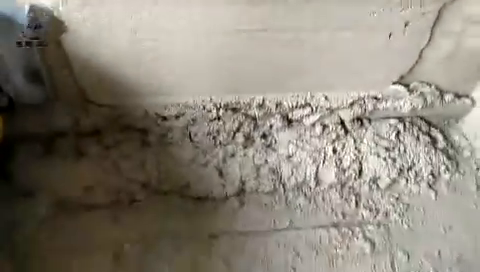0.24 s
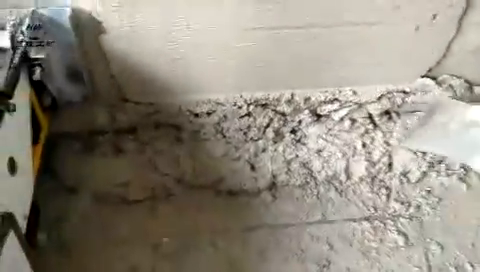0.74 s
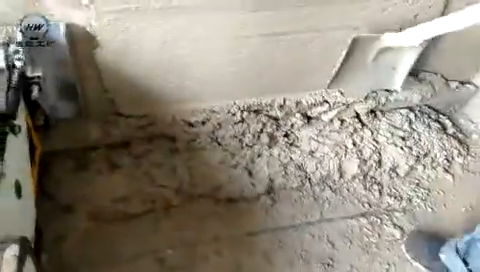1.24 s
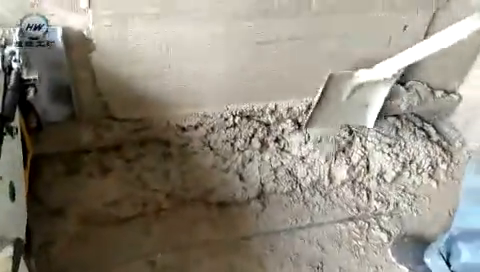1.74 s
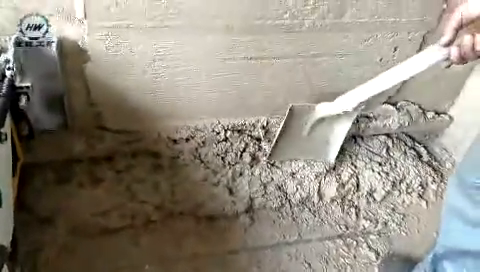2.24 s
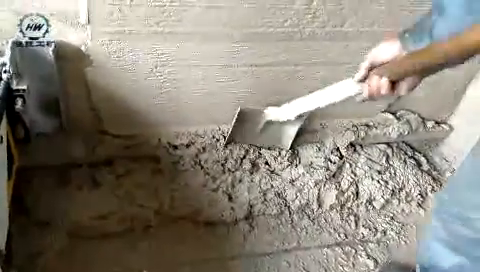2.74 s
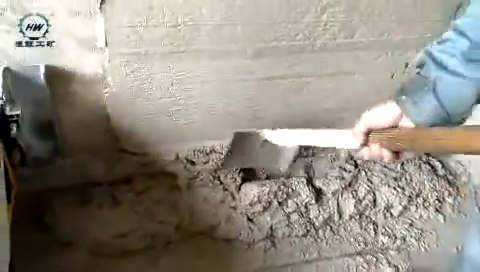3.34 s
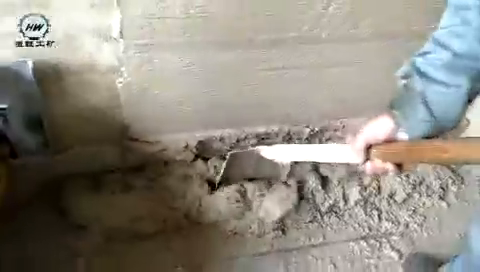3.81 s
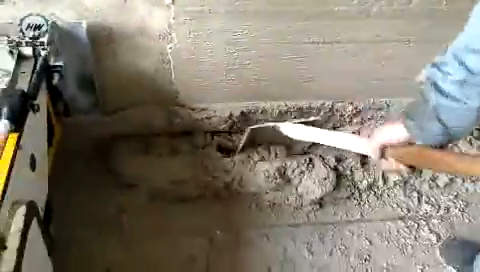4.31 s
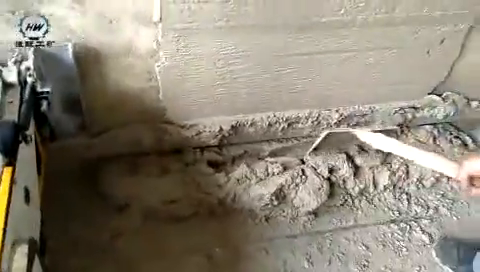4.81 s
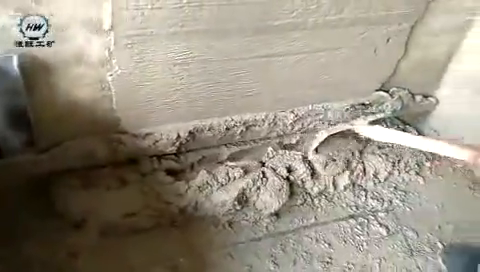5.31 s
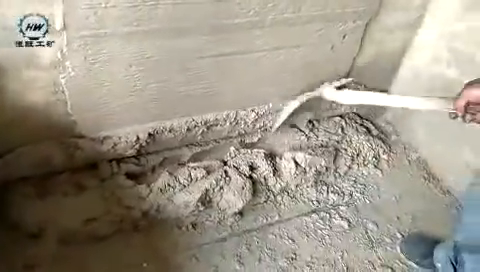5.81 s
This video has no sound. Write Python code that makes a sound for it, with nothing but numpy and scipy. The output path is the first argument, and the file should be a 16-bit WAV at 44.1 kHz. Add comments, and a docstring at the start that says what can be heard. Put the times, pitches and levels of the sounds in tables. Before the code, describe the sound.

A shovel works damp mortar at close range. Faint sand scuffs come first, then one loud dull thump with a gritty bite, softer scrapes and a sliding trickle of crumbs. Three crisp metallic chops space out across the later seconds before a brief harsh scrape and a final thud. The bare room adds a short dense reverb; the treble is sharp, with faint hiss and low building rumble beneath.

```python
"""A steel shovel works fallen mortar at the foot of a wall in a small bare concrete room.
Over quiet building rumble and hiss, filtered random grains make sand grind and small stones tick.
Crumbs slide off the heap, then soft masses thud as grain bursts that excite the room's modes.
From two seconds the edge chops, ringing the damped blade; near the end it drags on the concrete.
Two microphone ports close by, ringing in the treble, hear it all through decaying-noise wall echoes."""
import sys
import numpy as np
from scipy import signal
from scipy.fft import rfft, irfft
from scipy.io import wavfile

SR = 44100
rng = np.random.default_rng(int(sys.argv[2]) if len(sys.argv) > 2 else 0)


def persist_wave(psi):
    """Save psi, clipped to +-1, as 16-bit WAV."""
    counts = np.round(np.clip(psi, -1, 1) * 32767).astype(np.int16)
    wavfile.write(sys.argv[1], SR, np.atleast_2d(counts).T)


N = 267334
T = np.arange(N) / SR


def undb(db):
    """Decibels to gain."""
    return 10 ** (np.asarray(db) / 20)


def unit(x):
    """Scale to an energy of one."""
    return x / np.sqrt(np.sum(x ** 2) + 1e-18)


def on_log(hz, points):
    """Read (Hz, value) points along a log-frequency axis."""
    point_hz, value = np.transpose(points)
    return np.interp(np.log(np.maximum(hz, 1)), np.log(point_hz), value)


def colour(x, points):
    """Causal minimum-phase filter with the given (Hz, dB) response, by cepstrum folding."""
    size = 4096
    response_db = on_log(np.fft.rfftfreq(size, 1 / SR), points)
    cepstrum = irfft(np.log(undb(response_db)))
    cepstrum[1:size // 2] *= 2
    cepstrum[size // 2 + 1:] = 0
    impulse = irfft(np.exp(rfft(cepstrum)))
    return signal.fftconvolve(x, impulse)[:len(x)]


def band(x, low_hz, high_hz, order=2):
    """Band-pass between two edges."""
    high_hz = min(max(high_hz, low_hz * 1.1), SR * .48)
    sos = signal.butter(order, [low_hz, high_hz], "band", fs=SR, output="sos")
    return signal.sosfilt(sos, x)


def ring(x, modes):
    """The decaying modes that a sound excites, as (Hz, t60 s, dB)."""
    t = T[:SR // 2]
    response = 0
    for hz, t60_s, db in modes:
        mode = np.cos(2 * np.pi * hz * t) * undb(-60 * t / t60_s)
        response = response + undb(db) * unit(mode)
    return signal.fftconvolve(x, response)[:len(x)]


def grains(count, per_s, spread_db):
    """Sand grains crack at random moments with widely differing sizes; rms 1."""
    happens = rng.random(count) < per_s / SR
    sizes = undb(spread_db * np.minimum(rng.exponential(size=count), 4))
    signs = rng.choice([-1, 1], count)
    return unit(happens * sizes * signs) * np.sqrt(count)


def contact(length_s, first_blow, per_s, spread_db):
    """A first blow, then grains crushed for as long as the contact lasts."""
    push = np.zeros(SR // 3)
    count = max(int(length_s * SR), 40)
    push[:count] = unit(grains(count, per_s, spread_db))
    push[0] += first_blow
    return push


def add(out, s, sound, db, pan_db=0):
    """Place a sound; its level is its energy spread over a hundredth of a second."""
    start = int(s * SR)
    sound = (unit(sound) * np.sqrt(SR / 100))[:N - start]
    ports_db = db + np.array([[pan_db], [-pan_db]]) / 2
    out[:, start:start + len(sound)] += undb(ports_db) * sound


def rubbing(points, per_s, spread_db, judder_db, judder_hz):
    """A stream of grains that catches and slips as a random gain; rms 1."""
    knots = rng.standard_normal(N // 100)
    judder = np.interp(T * judder_hz, np.arange(len(knots)), knots)
    stream = grains(N, per_s, spread_db) * undb(judder_db * judder)
    return unit(colour(stream, points)) * np.sqrt(N)


def stroke(start_s, rise_s, hold_s, fall_db_per_s):
    """Gain of one movement: the pressure builds smoothly, holds and dies away."""
    build = np.sin(np.pi / 2 * np.clip((T - start_s) / rise_s, 0, 1)) ** 2
    since_release_s = np.maximum(T - start_s - rise_s - hold_s, 0)
    return build * undb(-fall_db_per_s * since_release_s)


def strokes(rows, fall_db_per_s):
    """Joint gain of (start s, rise s, hold s, dB) strokes; their powers add."""
    power = 0
    for s, rise_s, hold_s, db in rows:
        power = power + (undb(db) * stroke(s, rise_s, hold_s, fall_db_per_s)) ** 2
    return np.sqrt(power)


# noise floor spectrum: (frequency [Hz], density [dB per Hz])
FLOOR_SPECTRUM = [(20, -99), (45, -102), (80, -109), (200, -111), (700, -113), (3000, -113), (6000, -116),
                  (16000, -116)]


def air(side_share=0.72):
    """Quiet rumble of the building under a faint hiss, partly different at the two ports."""
    mid, side = (colour(rng.standard_normal(N), FLOOR_SPECTRUM) * np.sqrt(SR / 2) for _ in range(2))
    return mid + side_share * side * np.array([[1], [-1]])


# sand shifts under steel and soles, before fine_db and coarse_db:
# (start [s], rise [s], hold [s], level [dB], extra on the coarse grains [dB])
SAND_STROKES = [(0.048, .015, 0.0725, -53, -11), (0.473, 0.0678, 0.0244, -54.5, -2.5),
                (0.588, 0.019, 0.1025, -62.5, -6), (0.749, 0.05, 0.0177, -45.5, -11.5),
                (1.12, 0.0873, 0.0232, -52, -1.5), (1.314, 0.1344, .07, -56.5, -2),
                (1.569, 0.0227, 0.039, -62, -5.5), (1.938, 0.1053, 0.1286, -49, -5),
                (2.35, 0.0137, 0.0154, -63.5, -5), (2.702, 0.043, 0.1254, -47.5, -5.5),
                (2.964, 0.025, 0.009, -51, -9), (3.096, 0.0487, 0.124, -62, -11.5),
                (3.398, 0.1101, 0.015, -40.5, -18), (3.555, 0.1305, 0.172, -50.5, -24.5),
                (4.261, 0.0656, 0.1222, -49, -10), (4.538, 0.021, .02, -56.5, -19),
                (4.785, 0.0335, 0.069, -55, -5.5), (5.117, 0.0133, 0.016, -35.5, -18.5),
                (5.299, 0.069, 0.29, -59.5, -7), (5.968, 0.0255, 0.014, -45, -7.5)]
# grain colours: (frequency [Hz], relative level [dB])
FINE_SAND_COLOUR = [(200, -28), (1500, -8), (3000, -1), (4500, -0.5), (6500, -1.5), (9000, -8.5),
                    (16000, -8)]
COARSE_SAND_COLOUR = [(150, -12), (600, -6.5), (1200, -9), (1800, 3), (2600, 5), (4000, -3), (8000, -22),
                      (16000, -43.5)]
SAND_FALL_DB_PER_S = 190
# sand creaking steadily under the soles, before fine_db and coarse_db
SOLES_DB, SOLES_COARSE_DB = -69.5, -6  # second is relative to the first


def sand(fine_db=-6, coarse_db=-1):
    """Fine sand hisses and coarser grains crackle as blade and soles move."""
    fine = rubbing(FINE_SAND_COLOUR, per_s=2800, spread_db=6.0, judder_db=3.0, judder_hz=70.36)
    coarse = rubbing(COARSE_SAND_COLOUR, per_s=1700, spread_db=6.0, judder_db=6.5, judder_hz=64.44)
    s, rise_s, hold_s, db, rel_db = np.transpose(SAND_STROKES)
    fine_moves = strokes(zip(s, rise_s, hold_s, db), SAND_FALL_DB_PER_S)
    coarse_moves = strokes(zip(s, rise_s, hold_s, db + rel_db), SAND_FALL_DB_PER_S)
    fine_gain = np.hypot(fine_moves, undb(SOLES_DB))
    coarse_gain = np.hypot(coarse_moves, undb(SOLES_DB + SOLES_COARSE_DB))
    return undb(fine_db) * fine * fine_gain + undb(coarse_db) * coarse * coarse_gain


# single stones crack or flick against the steel, before the gains in scene():
# (time [s], level [dB], left minus right [dB])
STONE_TICKS = [(0.064, -59.5, 5), (.141, -64, 5.5), (1.53, -59.5, 1.5), (1.628, -55, 1.5), (2.71, -53, 5.5),
               (3.608, -53.5, 4.5), (4.3876, -50, 2), (4.452, -43, 0.5), (5.573, -54.5, 8),
               (5.599, -52.5, 6), (5.639, -56, 9)]


def ticks():
    """Small stones snap: very short and bright."""
    out = np.zeros((2, N))
    for s, db, pan_db in STONE_TICKS:
        snap = contact(.006, first_blow=.7, per_s=7000, spread_db=3)
        add(out, s, band(snap, 2500, 6500), db, pan_db)
    return out


# crumbs slide off the heap: (start [s], rise [s], hold [s], level [dB])
CRUMB_SLIDES = [(.48, 0.0236, 0.0395, -73.5), (2.88, 0.089, 0.171, -72), (3.42, 0.071, 0.2, -64.5),
                (3.64, 0.0167, 0.293, -58.5), (4.02, 0.0646, 0.057, -56.5)]
# (frequency [Hz], relative level [dB])
CRUMB_SPECTRUM = [(40, -3.5), (150, -3), (380, 3.5), (700, -6), (1500, -3.5), (4000, -6), (16000, -38)]
CRUMB_FALL_DB_PER_S = 125


def crumbs():
    """Damp crumbs patter down the heap as a sparse, dull grain stream."""
    patter = rubbing(CRUMB_SPECTRUM, per_s=400, spread_db=2, judder_db=2.5, judder_hz=35)
    return patter * strokes(CRUMB_SLIDES, CRUMB_FALL_DB_PER_S)


# standing waves of the room: (frequency [Hz], t60 [s], level against the thud before modes_db [dB])
STANDING_WAVES = [(126, .5, -34), (189, .45, -30), (235, .25, -29), (334, .26, -26), (419, .22, -28),
                  (447, .2, -29), (603, .2, -29), (886, .22, -23)]


def squash(length_s, low_hz, high_hz, slap_db=-22, slab_db=-16, modes_db=-2):
    """A soft mass squashes with a faint wet slap, shakes the slab and stirs the room's standing waves."""
    # the shorter the squash, the more of it comes in the first blow
    push = contact(length_s, first_blow=.006 / length_s, per_s=6000, spread_db=3)
    body = band(push, low_hz, high_hz, order=3)
    slap = undb(slap_db) * band(push, high_hz, 3 * high_hz)
    slab = undb(slab_db) * band(push, 62, 160)
    return body + slap + slab + undb(modes_db) * ring(body + slab, STANDING_WAVES)


# wet mortar and boots land on the slab: (time [s], squash length [s], level [dB],
# low edge [Hz], high edge [Hz], slump relative to landing [dB])
LANDINGS = [(0.844, 0.026, -67, 402, 620, -11.5), (2.043, 0.00397, -18, 232.6, 1084, -9),
            (2.37, 0.0646, -53.5, 69.7, 159, -3), (2.557, 0.034, -39.5, 347, 2275, -17.5),
            (3.0, 0.0271, -57.5, 140, 2000, -9.5), (3.891, 0.0452, -35, 216, 2240, -15),
            (3.911, 0.032, -37, 91.6, 400, -12), (5.164, 0.00179, -30, 330, 1002, -3.5),
            (5.851, 0.003136, -18.5, 214.3, 912, -10), (5.853, .008, -40.5, 65.2, 151.3, -22)]
SLUMP_AFTER_S, SLUMP_EXTRA_S, SLUMP_HZ_RATIO = 0.016, 0.013, 0.884


def thuds():
    """Each mass lands, then after a pause slumps with a longer, duller push."""
    out = np.zeros((2, N))
    for s, length_s, db, low_hz, high_hz, slump_db in LANDINGS:
        add(out, s, squash(length_s, low_hz, high_hz), db)
        slump = squash(length_s + SLUMP_EXTRA_S, low_hz * SLUMP_HZ_RATIO, high_hz * SLUMP_HZ_RATIO)
        add(out, s + length_s + SLUMP_AFTER_S, slump, db + slump_db)
    return out


# the blade bites into grit: (time [s], contact length [s], level [dB], low edge [Hz],
# high edge [Hz], left minus right [dB], graze before the bite [s])
BITES = [(2.0433, 0.016, -29.5, 648, 3179, 5.5, 0.0143), (2.044, 0.0052, -38.5, 4400, 15100, -4, .012),
         (2.706, 0.00694, -50, 700, 5000, 1.5, .002), (2.753, 0.00775, -44, 820, 2500, 3, .003),
         (2.804, 0.024, -44, 740, 1934, 0.5, .003), (4.092, 0.017, -35.5, 6134, 14100, 0.5, .002),
         (4.1227, 0.012, -15, 618, 13050, -0.5, .009), (4.642, 0.0134, -17.5, 750.7, 13700, 0.5, .003),
         (5.0986, 0.013, -16, 540, 15470, -.5, .006), (5.703, 0.019, -42, 521, 896, 4, 0.00322),
         (5.841, 0.01018, -20.5, 965, 13470, 0, 0.0019)]
# crushed grit: (frequency [Hz], relative level [dB])
CRUNCH_COLOUR = [(100, 18), (500, -4.5), (1000, -1.5), (1600, -0.5), (2500, 1.5), (3700, -1), (6000, -1.5),
                 (9000, -6), (16000, -3.5)]
# blade damped by its load, also rung by drag():
# (frequency [Hz], t60 [s], level against the direct sound before blade_db or ring_db [dB])
BLADE_MODES = [(560, .09, -22), (630, .1, -20), (800, .11, -15), (875, .16, -16), (1230, .08, -22),
               (1650, .13, -20), (2288, .15, -16), (2450, .1, -21)]
GRAZE_DB, FOLLOW_AFTER_S, FOLLOW_STRETCH, FOLLOW_DB = -16.5, .0095, 1.3, -3.5  # dB relative to bite


def chops(blade_db=-4, bite_blow=.36):
    """The edge grazes, bites and beds down, crushing sand against the slab; the blade rings briefly."""
    out = np.zeros((2, N))
    for s, length_s, db, low_hz, high_hz, pan_db, graze_s in BITES:
        # each touch: (s, contact length s, dB, strength of its first blow)
        graze = (s - graze_s, graze_s, db + GRAZE_DB, 0)
        bite = (s, length_s, db, bite_blow)
        follow = (s + FOLLOW_AFTER_S, length_s * FOLLOW_STRETCH, db + FOLLOW_DB, bite_blow / 2)
        for touch_s, contact_s, touch_db, blow in (graze, bite, follow):
            push = contact(contact_s, first_blow=blow, per_s=3500, spread_db=4.5)
            crunch = colour(push, CRUNCH_COLOUR)
            ringing = crunch + undb(blade_db) * ring(crunch, BLADE_MODES)
            add(out, touch_s, band(ringing, low_hz, high_hz, order=3), touch_db, pan_db)
    return out


# the edge drags on bare concrete, lightly and then leaned on:
# (start [s], rise [s], hold [s], level [dB])
DRAG_STROKES = [(5.57, 0.0381, 0.2216, -45), (5.685, 0.0556, 0.0365, -31.5)]
# (frequency [Hz], relative level [dB])
DRAG_SPECTRUM = [(100, -20.5), (450, -15.5), (620, -15), (760, -19), (1200, -6.5), (1700, 2), (2500, 8.5),
                 (4200, 4.5), (6000, -1), (7000, -4.5), (8200, -23.5), (16000, -24.5)]
DRAG_FALL_DB_PER_S = 900.5


def drag(ring_db=-2):
    """The steel edge rasps over the concrete and sets the blade ringing."""
    stream = rubbing(DRAG_SPECTRUM, per_s=1500, spread_db=4, judder_db=2.6, judder_hz=160)
    rasp = stream * strokes(DRAG_STROKES, DRAG_FALL_DB_PER_S)
    return rasp + undb(ring_db) * ring(rasp, BLADE_MODES)


# first stage of the room's two-stage decay: (frequency [Hz], t60 [s])
EARLY_T60 = [(100, .38), (260, 0.303), (700, 0.21), (1800, 0.2094), (5000, 0.1445), (13000, 0.14)]
PORT_GAP_M = .12


def room(direct_db=-6, late_db=-23, late_t60_s=0.5713, build_s=0.00056):
    """Two-port response: direct sound, dense wall echoes, faint longer tail from the rest of the building."""
    t = T[:SR]
    hz = np.fft.rfftfreq(SR, 1 / SR)
    # spaced ports hear nearly the same bass and unrelated treble; 343 m/s
    alike = .94 * np.sinc(2 * hz * PORT_GAP_M / 343)
    mid, side = rfft(rng.standard_normal((2, SR))) * np.sqrt([1 + alike, 1 - alike])
    ports = np.array([mid + side, mid - side])
    edges_hz = np.r_[0, np.geomspace(100, SR / 2, 15)]
    out = np.zeros((2, SR))
    for low, high in zip(edges_hz, edges_hz[1:]):
        t60_s = on_log((low + high) / 2, EARLY_T60)
        decay = undb(-60 * t / t60_s) + undb(late_db - 60 * t / late_t60_s)
        noise = irfft(ports * ((hz >= low) & (hz < high)))
        echoes = noise * decay * (1 - np.exp(-t / build_s))
        out += unit(echoes) * 2 * np.sqrt((high - low) / SR)
    # direct sound reaches the left port 1 to 5 samples after the right
    out[[0, 1], [rng.integers(1, 6), 0]] += undb(direct_db)
    return unit(out) * np.sqrt(2)


def in_room(x, dwell_s, count):
    """The sound cycles from spot to spot by crossfades; every spot has its own pattern of wall echoes."""
    out = 0
    for spot in range(count):
        away = np.abs((T / dwell_s - spot + 1) % count - 1)
        share = np.cos(np.minimum(away, 1) * np.pi / 2)
        out = out + signal.fftconvolve(x * share, room(), axes=1)[:, :N]
    return out


def scene():
    """All the shovel work sounds through the room."""
    stones = ticks()
    # the point of contact darts along the edge; a heavy clod spreads slowly
    gritty = in_room(sand() + .75 * stones + chops() + drag(), dwell_s=.007, count=5)
    heavy = in_room(crumbs() + thuds(), dwell_s=.03, count=3)
    # flicked stones land nearer the ports, so part of their sound arrives dry
    return air() + gritty + heavy + .5 * stones


# response of the microphone ports: (frequency [Hz], gain [dB])
PORT_RESPONSE = [(30, 7), (3000, 0.5), (3700, 2.5), (4600, 8.5), (5200, 12.5), (5800, 16.5), (6400, 11),
                 (7200, 4), (9500, 3), (12500, -1), (14500, 5.5), (16000, -4.5)]
# (frequency [Hz], left port minus right port [dB])
PORT_DIFFERENCE = [(500, -0.5), (1100, 3), (2600, 3.5), (5000, 1), (8000, 3), (13000, 0)]
TOP_HZ = 16000


def record(dry):
    """The ports ring near 6 kHz, each with its own colour; peaks clip at full scale, then the top is cut."""
    ports = []
    for x, sign in zip(dry, (1, -1)):
        own_colour = [(hz, sign * db / 2) for hz, db in PORT_DIFFERENCE]
        ports.append(colour(colour(x, PORT_RESPONSE), own_colour))
    low_pass = signal.ellip(12, .2, 100, TOP_HZ, fs=SR, output="sos")
    return signal.sosfilt(low_pass, np.clip(ports, -1, 1))


dry = scene()
out = record(dry)
persist_wave(out)
```